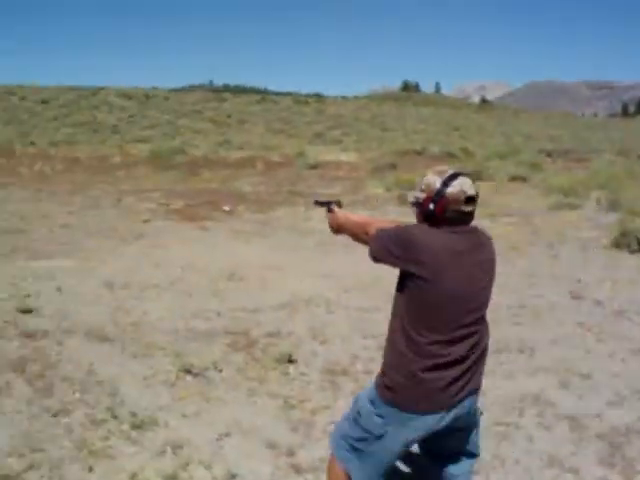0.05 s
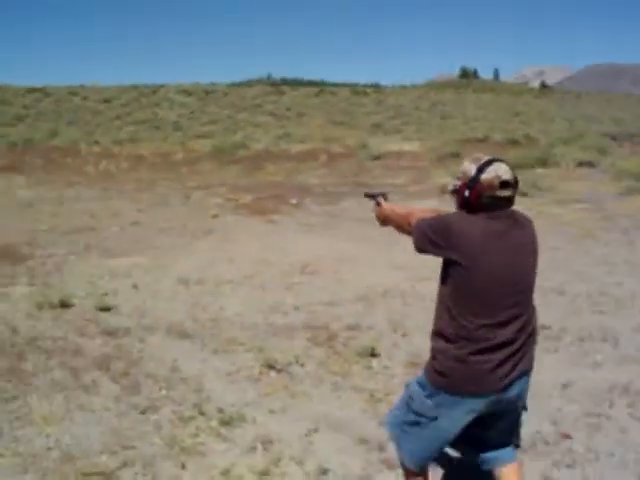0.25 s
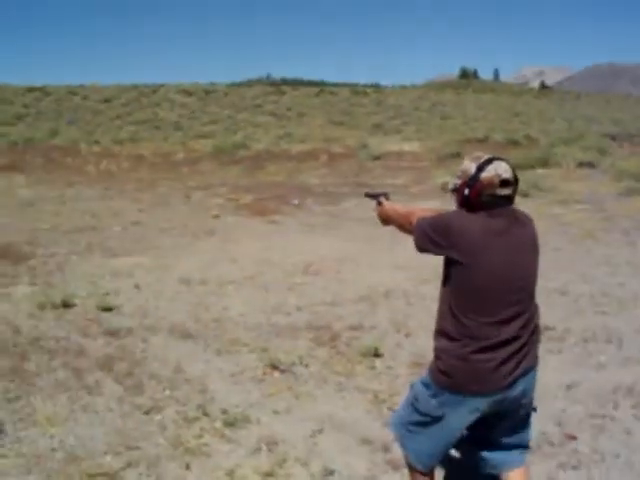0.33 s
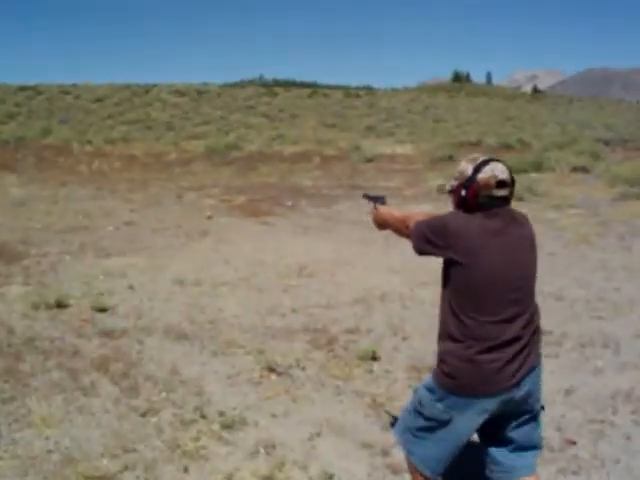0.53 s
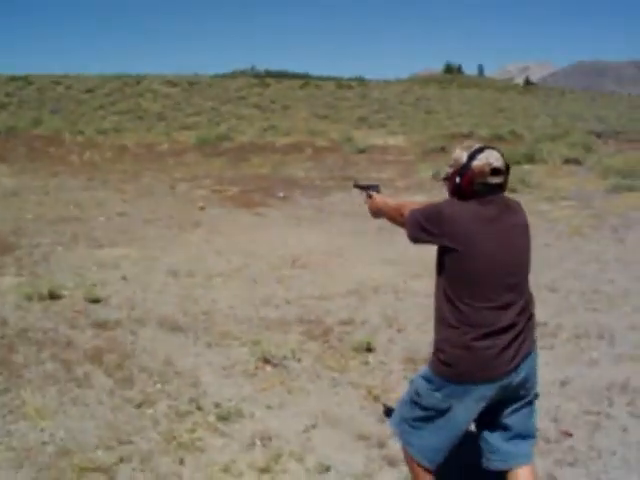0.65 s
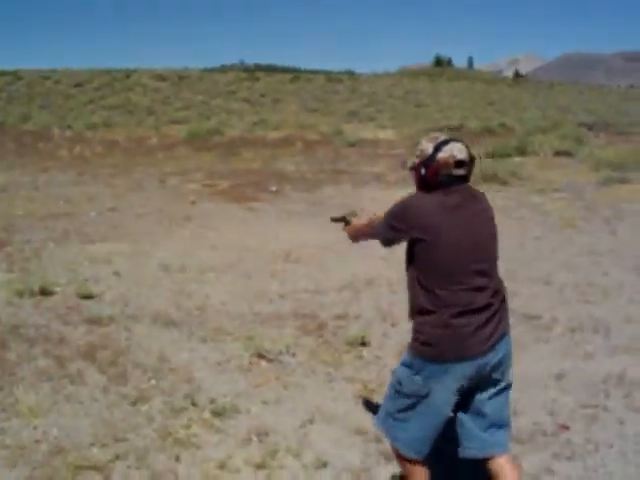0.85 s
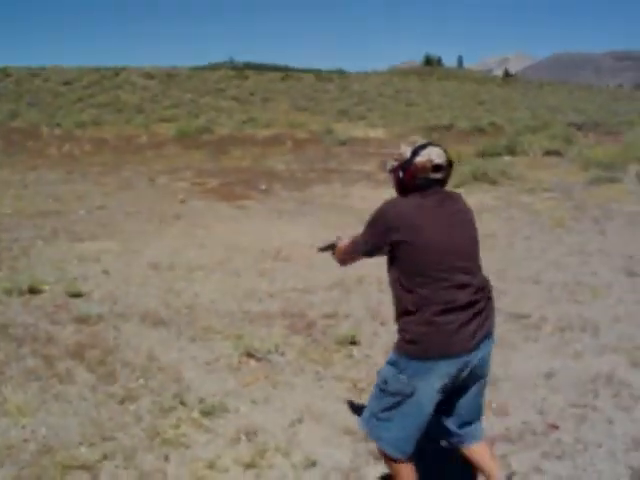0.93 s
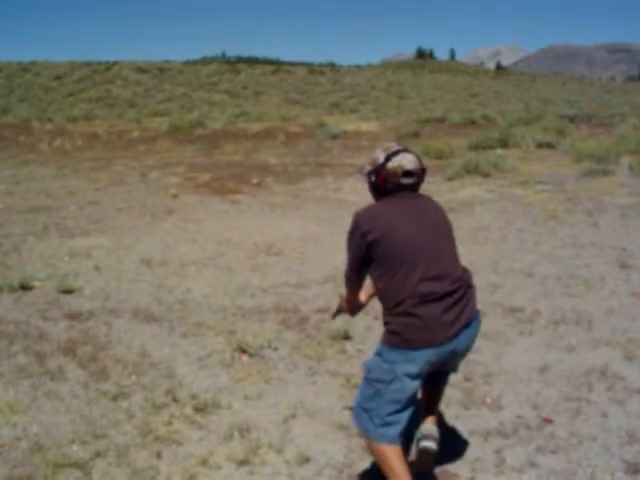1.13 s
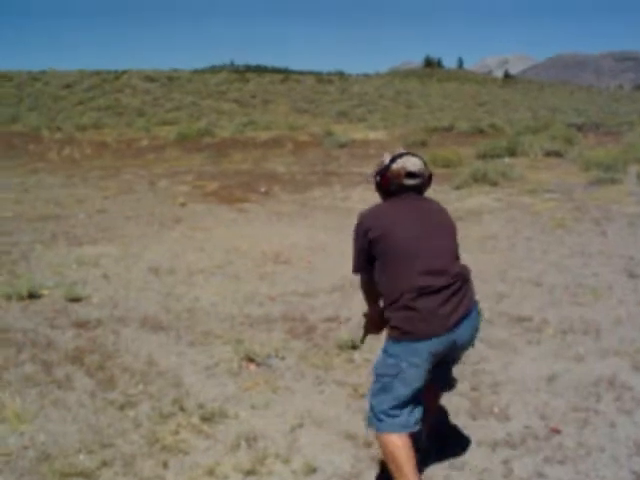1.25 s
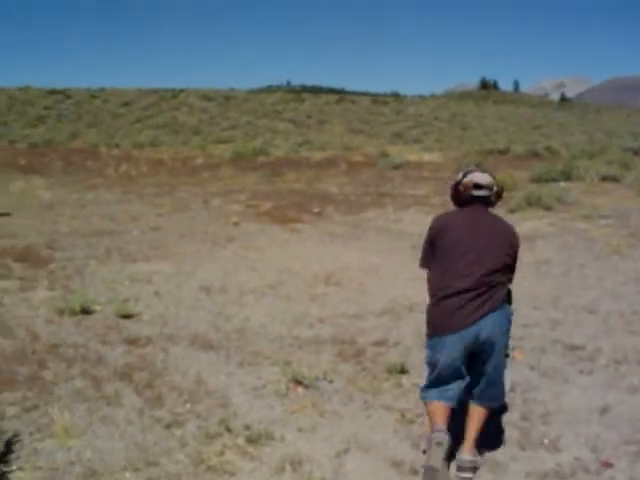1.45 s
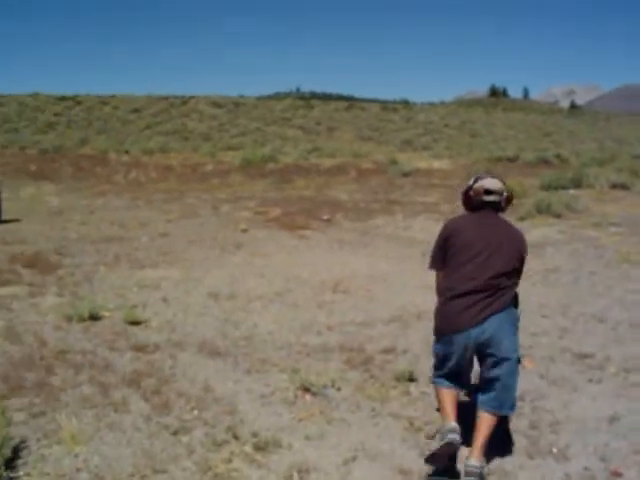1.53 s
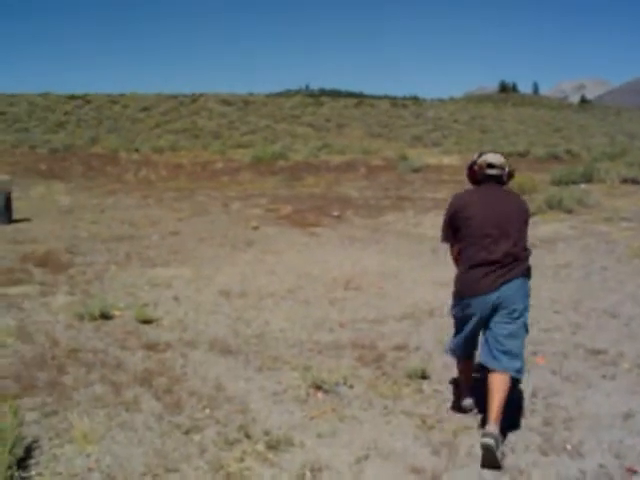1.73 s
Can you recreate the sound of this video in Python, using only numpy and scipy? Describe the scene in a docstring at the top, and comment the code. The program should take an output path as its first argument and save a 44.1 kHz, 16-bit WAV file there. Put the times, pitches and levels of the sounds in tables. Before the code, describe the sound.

Two loud pistol shots crack at about 0.2 and 0.6 seconds, close enough to distort the microphone. Each scatters back from open ground as a grainy roar with short slapping echoes, gone by 1 second. A distant steel plate rings very faintly from 0.7 seconds. Soft footsteps crunch on gravel with low microphone thumps, clearest around 1.4 seconds and again near 1.8, over quiet outdoor air.

```python
"""Open scrubland, where two pistol shots a few metres away overload a small microphone.
Each muzzle blast is an N-wave; brush and slopes scatter it back as a grainy dying roar with a few
distinct slaps. The roar of an earlier shot is still fading at the start. A far steel plate, struck by
the second bullet, rings faintly in two modes. Quiet air, low thumps on the microphone and feet on
gravel are heard before and after the shots."""
import sys
import numpy as np
from scipy import signal
from scipy.io import wavfile

SR = 44100
rng = np.random.default_rng(int(sys.argv[2]) if len(sys.argv) > 2 else 0)


def unload_audio(sound):
    """Save the sound as a 16-bit wav file, at the path given as the first command line argument."""
    columns = np.transpose(np.atleast_2d(sound))
    # keep every value between -1 and 1, then stretch to whole-number steps
    steps = np.round(np.clip(columns, -1, 1) * 32767)
    wavfile.write(sys.argv[1], SR, steps.astype(np.int16))


N = 79380
TIME = np.arange(N) / SR


def from_db(db):
    return 10 ** (np.asarray(db) / 20)


def unit_rms(x):
    return x / np.sqrt(np.mean(x ** 2) + 1e-20)


def drift(corner_hz):
    """Low-pass filtered Gaussian noise: a slow random fluctuation of unit RMS."""
    step = 40   # samples between control points
    pole = np.exp(-2 * np.pi * corner_hz * step / SR)
    slow = signal.lfilter([1], [1, -2 * pole, pole ** 2], rng.standard_normal(N // step + 2002))[2000:]
    return np.interp(np.arange(N) / step, np.arange(len(slow)), unit_rms(slow))


def resonance(x, hz, width_hz):
    """A two-pole resonator passes a band about its natural frequency."""
    r = np.exp(-np.pi * width_hz / SR)
    gain = (1 - r * r) / 2
    return signal.lfilter([gain, 0, -gain], [1, -2 * r * np.cos(2 * np.pi * hz / SR), r * r], x)


def grains(per_s, spread_db):
    """A Poisson process: independent impulses of random size and sign."""
    sizes = from_db(spread_db * np.minimum(rng.exponential(1, N), 4)) * rng.choice([-1, 1], N)
    return unit_rms(sizes * (rng.random(N) < per_s / SR)) + 1e-9


def bands(sources, spectrum, flicker_db):
    """Third-octave analysis: (centre frequency, signal) pairs, each fluctuating about the spectrum."""
    edges = 28 * 2 ** np.arange(0, 8.7, 1 / 3)
    freqs, levels = np.transpose(spectrum)
    parts = []
    for k, (low, high) in enumerate(zip(edges, edges[1:])):
        hz = np.sqrt(low * high)
        db = np.interp(np.log(hz), np.log(freqs), levels) + flicker_db * drift(25)
        bandpass = signal.butter(2, [low, high], "band", fs=SR, output="sos")
        band = signal.sosfilt(bandpass, sources[k % len(sources)])
        parts.append((hz, (-1) ** k * from_db(db) * band))   # alternate signs join without notches
    return parts


# Decay of the scattered sound, one list a shot: t/s, low-band level/dB, relative treble gain/dB
ROAR_DECAYS = [
    [(0, -38.5, -12), (.04, -48, -9), (.06, -43.5, -4.5), (.11, -46.5, 1), (.17, -52.5, -3.5),
     (.19, -44.5, -45)],
    [(.2125, 14, 6), (.222, -6, 2), (.236, -15.5, 0.5), (.246, -23.5, 5), (.258, -23, 5.5),
     (.278, -19.5, -5), (.3, -21, 1.5), (.35, -23, -5), (.37, -28, -8), (.43, -40.5, -7.5), (.5, -45.5, -8),
     (.57, -51, -4.5), (.59, -64, -41)],
    [(.5918, 0, 3), (.605, -7.5, 3), (.609, -18, 2), (.613, -12, 1), (.62, -18, 0.5), (.642, -19.5, -1),
     (.648, -26, -7), (.668, -20, -1.5), (.677, -19, -23), (.687, -31.5, 3.5), (.706, -24, -19),
     (.735, -32, -12.5), (.81, -42.5, -8), (.87, -55, -3), (1.0, -61.5, 0)],
]
# Spectrum of the scattered sound: f/Hz, relative spectral level/dB
ROAR_SPECTRUM = [(140, -20), (230, -7), (340, 0), (480, -7.5), (690, 1), (950, -9.5), (1700, -7.5),
                 (2300, -8), (3500, -13), (7900, -24.5), (10000, -43.5)]


def roar(treble_from_hz=695, treble_full_hz=1710):
    """Diffuse scattering: countless echoes from brush merge, the treble decaying at its own rate."""
    level_db, treble_db = np.full(N, -120.), np.zeros(N)
    for decay in ROAR_DECAYS:
        times, levels, trebles = np.transpose(decay)
        arrived = TIME >= times[0]
        level_db[arrived] = np.interp(TIME[arrived], times, levels)
        treble_db[arrived] = np.interp(TIME[arrived], times, trebles)
    parts = bands([grains(per_s=6000, spread_db=3.5)], ROAR_SPECTRUM, flicker_db=2.06)
    low_band = sum(band for hz, band in parts if hz < treble_from_hz)
    out = np.zeros(N)
    for hz, band in parts:
        if hz > 115:
            treble_share = np.log(hz / treble_from_hz) / np.log(treble_full_hz / treble_from_hz)
            out += band * from_db(treble_db * np.clip(treble_share, 0, 1))
    return from_db(level_db) * out / np.std(low_band)


# Spectrum of the open air: f/Hz, relative spectral level/dB
AIR_SPECTRUM = [(18, -35), (30, 11), (152, 2.5), (285, 3), (452, -7), (683, 1.5), (982, -6), (2590, -24),
                (3380, -30), (4000, -22), (9800, -23), (12700, -23)]


def air(level_db=-50, gust_db=1, gust_below_hz=300):
    """Random amplitude modulation: quiet ambient noise flickers, and its bass comes in lumps."""
    gust = from_db(gust_db * drift(38))
    parts = bands(rng.standard_normal((2, N)), AIR_SPECTRUM, flicker_db=5)
    noise = sum(band * (gust if hz < gust_below_hz else 1) for hz, band in parts)
    return from_db(level_db) * unit_rms(noise)


def snaps(rows, low_hz=312, top_hz=4900):
    """Exponential damping: a tone and a broadband snap die away together in each burst."""
    out, t = np.zeros(N + SR), np.arange(2000) / SR
    for onset, db, hz, ring_ms, tone_share in rows:
        snap = 0.5 * rng.standard_normal(len(t))
        snap[:4] += 1.47 * np.array([1, 1, -1, -1])   # leading spike
        snap = signal.lfilter(*signal.butter(1, top_hz, fs=SR), snap)
        burst = tone_share * np.sin(2 * np.pi * hz * t) + (1 - tone_share) * snap
        start = int(onset * SR)
        out[start:start + len(t)] += from_db(db - 40 * t / (ring_ms / 1000)) * burst
    return signal.sosfilt(signal.butter(2, low_hz, "high", fs=SR, output="sos"), out[:N] + 1e-18)


# Single ticks of grit: t/s, level/dB, f/Hz, time to fall 40 dB/ms, tonal share
GRIT_TICKS = [(.0225, -14, 600, 5.3, 0.73), (.0722, -12.5, 5750, 4, 0.17), (.0852, -7.5, 1640, 10.2, 0.1),
              (1.115, -28, 2820, 6.4, 0.25), (1.157, -34.5, 1040, 69, 0.33),
              (1.3265, -28.5, 4830, 6.7, 0.18), (1.338, -23.5, 594, 5.6, 1), (1.3665, -25, 4070, 6.4, 0.13),
              (1.3795, -16.5, 1700, 3.7, 0.4), (1.384, -30, 5030, 4.5, .1), (1.39, -30, 4940, 5, 0.1),
              (1.396, -28, 2560, 9.3, .2), (1.444, -26.5, 4200, 9.9, 0.14), (1.471, -32, 4370, 7.9, 0.32),
              (1.576, -33.5, 2760, 6.1, 0.52), (1.632, -33.5, 1390, 7.8, 0.9), (1.641, -31, 726, 7.4, 0.82),
              (1.739, -33, 4050, 26, 0.35)]


def grit_ticks():
    """Impact excitation: single grains tick and ring briefly underfoot."""
    return snaps(GRIT_TICKS)


# Crunches underfoot: centre t/s, level/dB, duration/s
GRAVEL_CRUNCHES = [(0.062, -30, 0.0074), (0.121, -40, 0.016), (0.165, -38, 0.014), (0.536, -40, 0.013),
                   (0.737, -31.5, 0.014), (0.977, -53.5, 0.05), (1.158, -51, 0.0084), (1.354, -42, 0.018),
                   (1.392, -41.5, 0.036), (1.46, -48, 0.066), (1.762, -52.5, 0.071)]
# Spectrum of the gravel: f/Hz, relative spectral level/dB
GRAVEL_SPECTRUM = [(400, -0.5), (700, 1.5), (1300, -9.5), (2500, -6.5), (5000, -13.5), (10000, -21)]


def gravel():
    """Superposed impacts: dense clicks swell under each scuff; the last step drags a bright scrape."""
    def swell(centre, db, length_s):
        return from_db(db) * np.exp(-2 * ((TIME - centre) / length_s) ** 2)

    grit = grains(per_s=4500, spread_db=4.5)
    crunch = sum(band for hz, band in bands([grit], GRAVEL_SPECTRUM, flicker_db=1) if hz > 290)
    scrape = resonance(grit, hz=6400, width_hz=1100)
    scuffs = sum(swell(*row) for row in GRAVEL_CRUNCHES)
    drag = swell(centre=1.785, db=-54, length_s=0.055)
    return scuffs * unit_rms(crunch) + drag * unit_rms(scrape)


# Low thumps on the microphone: centre t/s, level/dB, f/Hz, duration/ms
MIC_THUMPS = [(0.079, -23.5, 126, 7.5), (0.162, -42, 130, 15), (.29, -32, 34, 27), (0.518, -35.5, 90, 10),
              (0.779, -32.5, 102, 7.2), (1.007, -36, 90.4, 14), (1.034, -40, 132, 14),
              (1.078, -40.5, 124, 22), (1.18, -31, 129, 9.7), (1.328, -49, 116, 29),
              (1.361, -23, 142, 17.7), (1.395, -18.5, 107.4, 14), (1.448, -29.5, 111, 13),
              (1.476, -30.5, 124.5, 20.5), (1.594, -41, 87, 16), (1.646, -40, 131, 16),
              (1.744, -25, 101, 9.5), (1.771, -42.5, 119, 18)]


def thumps(second_harmonic=0.33):
    """Gaussian wave packets: each thump is a few low swings, sharpened by a second harmonic."""
    out = np.zeros(N)
    for centre, db, hz, length_ms in MIC_THUMPS:
        phase = 2 * np.pi * hz * (TIME - centre) + rng.uniform(0, 2 * np.pi)
        envelope = from_db(db) * np.exp(-((TIME - centre) * 2000 / length_ms) ** 2)
        out += envelope * (np.sin(phase) + second_harmonic * np.sin(2 * phase))
    return out


# Pistol shots: t/s, N-wave level before clipping/dB, microphone thud level before clipping/dB
PISTOL_SHOTS = [(0.2123, 15.5, 9.5), (0.5912, 29.5, 5)]


def blasts(pulse_s=0.00076, thud_s=0.0034, settle_hz=11, settle_db=-35, settle_t60_s=0.6):
    """N-wave: each shot is a sharp crack; the overloaded microphone adds a thud and slowly settles."""
    out, t = np.zeros(N + SR), np.arange(SR // 4) / SR
    n_wave = (1 - 2 * t / pulse_s) * (t < pulse_s)
    settling = from_db(settle_db - 60 * t / settle_t60_s) * np.sin(2 * np.pi * settle_hz * t)
    mic_thud = np.exp(-(t / thud_s) ** 2) - settling   # offset of lopsided clipping, and its recovery
    for onset, pulse_db, thud_db in PISTOL_SHOTS:
        start = int(onset * SR)
        out[start:start + len(t)] -= from_db(pulse_db) * n_wave + from_db(thud_db) * mic_thud
    return out[:N]


# Distinct echoes: t/s, level/dB, f/Hz, time to fall 40 dB/ms, tonal share
SLAP_ECHOES = [(.2478, -2, 1470, 9.7, 1), (.2582, 14, 1080, 2.6, 0.68), (.6515, 1.5, 1450, 1.8, 1),
               (.2865, 4, 2340, 13.6, 0.25), (.2942, 2.5, 3020, 19, 0.16), (.2995, -1, 2440, 4.4, 0.14),
               (.638, -5.5, 788, 16, 0.88), (.6648, 4.5, 2190, 3.4, 0.41), (.688, -7, 678, 28, 0.47),
               (.694, 3.5, 3700, 1.1, 0.53), (.7178, -10, 3730, 3.3, 1), (.7248, -10, 397, 9.1, 0.97)]


def slaps():
    """Discrete reflection: brush and slopes return each blast as a few short, coloured echoes."""
    return snaps(SLAP_ECHOES)


# Modes of the far steel plate: f/Hz, level/dB, time to fall 60 dB/s
PLATE_MODES = [(639, -49, 3.5), (533, -55, 5)]


def plate(struck_s=0.7, sag_per_s=0.03):
    """Free vibration: struck by the second bullet, two modes decay slowly and sag a little in pitch."""
    t = np.maximum(TIME - struck_s, 0)
    return sum(from_db(db - 60 * t / t60) * np.sin(2 * np.pi * hz * t * (1 - sag_per_s * t / 2))
               for hz, db, t60 in PLATE_MODES)


def scene():
    """Linear superposition: all sources add at one microphone."""
    return (blasts() + roar() + slaps() + grit_ticks() + gravel() + thumps() + plate() + air())[None]


def saturate(x, ceiling, hardness=6.8):
    """Saturation: small signals pass unchanged, large ones flatten at the ceiling."""
    return x / (1 + np.abs(x / ceiling) ** hardness) ** (1 / hardness)


def record(dry, mic_top_hz=10100, cutoff_hz=16900):
    """Clipping and band limiting: a steep filter overshoots on the flat tops, which clip again."""
    mic_lowpass = signal.ellip(10, 0.5, 80, mic_top_hz, fs=SR, output="sos")
    output_lowpass = signal.cheby2(12, 70, cutoff_hz, fs=SR, output="sos")
    overloaded = signal.sosfilt(mic_lowpass, saturate(dry, ceiling=0.61))
    return signal.sosfilt(output_lowpass, saturate(overloaded, ceiling=0.71))


dry = scene()
out = record(dry)
unload_audio(out)
```